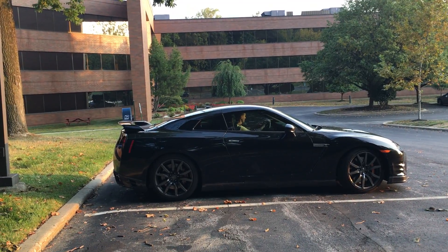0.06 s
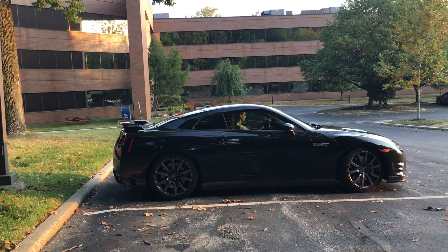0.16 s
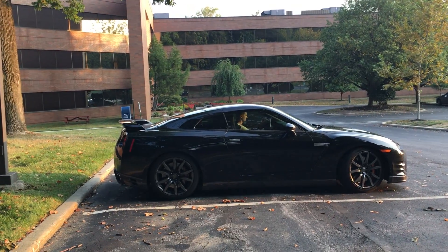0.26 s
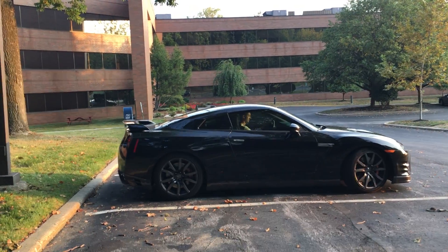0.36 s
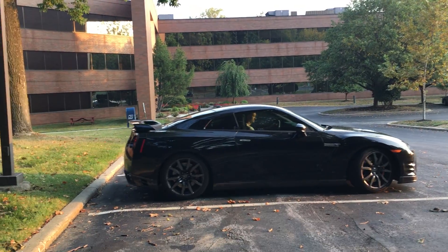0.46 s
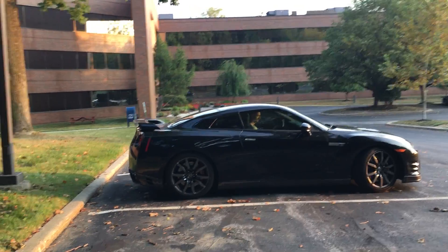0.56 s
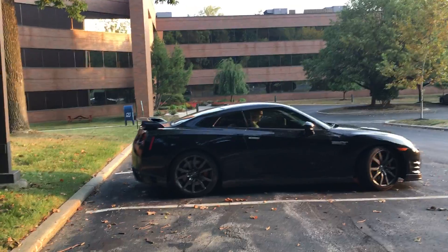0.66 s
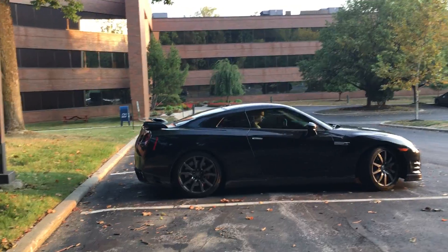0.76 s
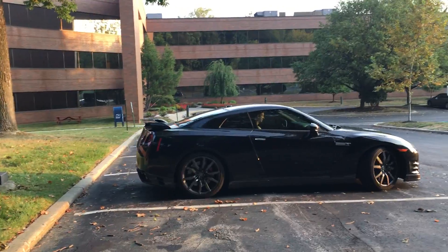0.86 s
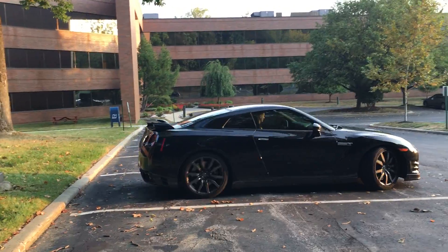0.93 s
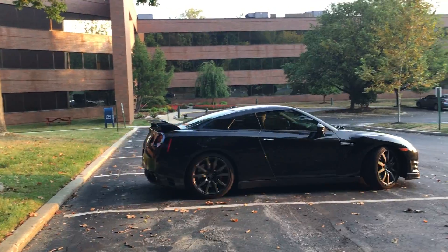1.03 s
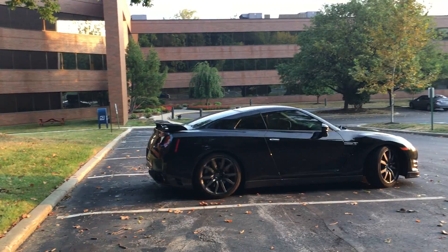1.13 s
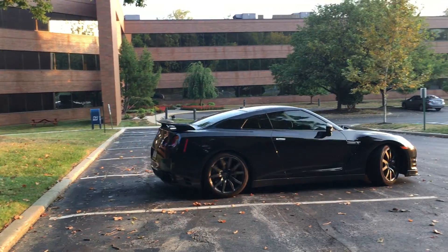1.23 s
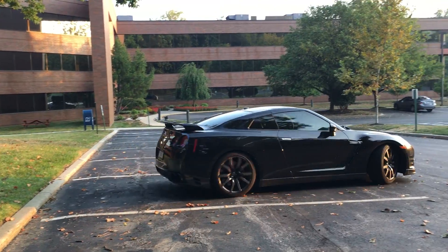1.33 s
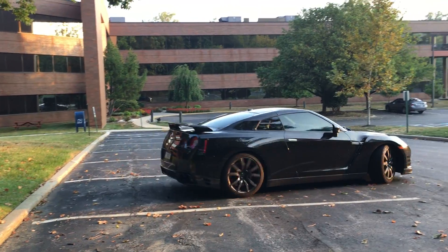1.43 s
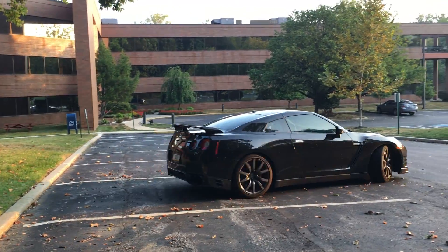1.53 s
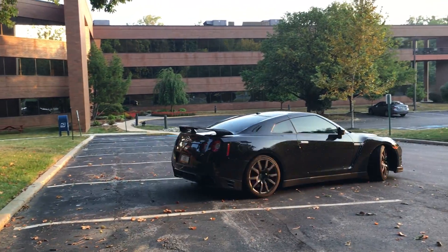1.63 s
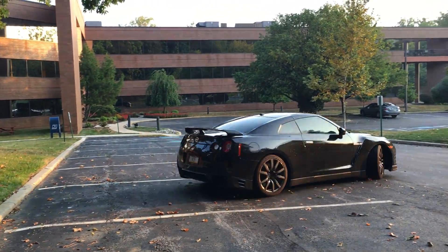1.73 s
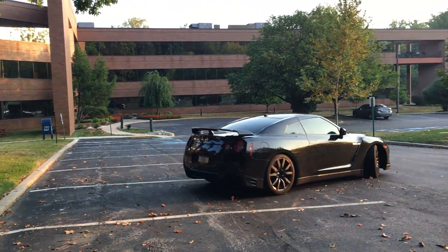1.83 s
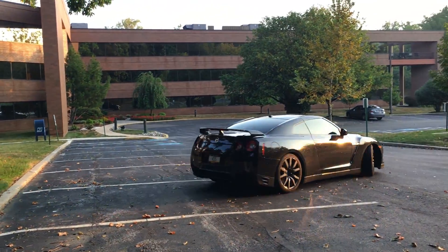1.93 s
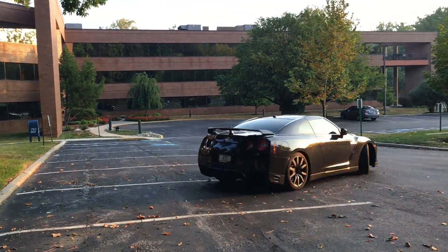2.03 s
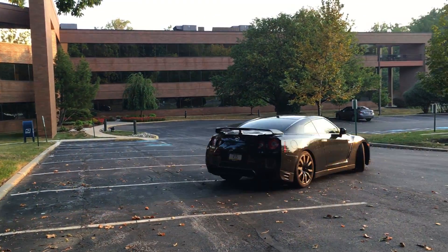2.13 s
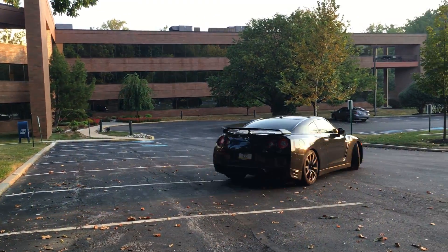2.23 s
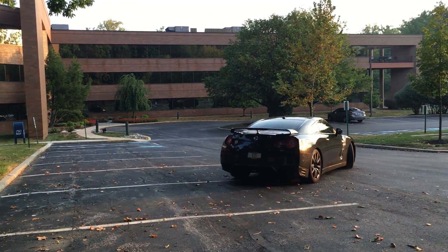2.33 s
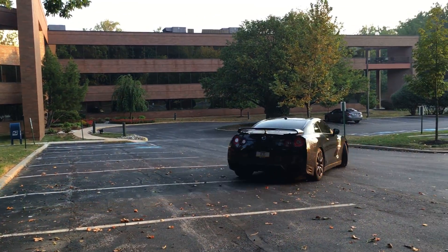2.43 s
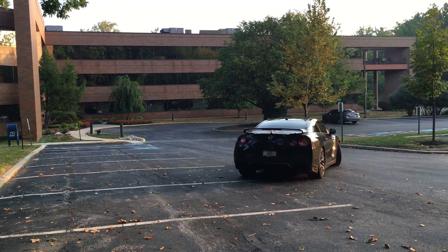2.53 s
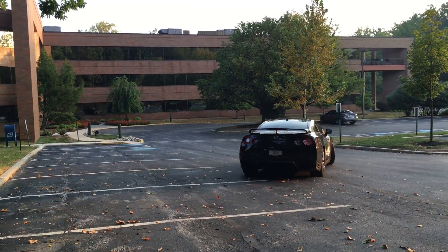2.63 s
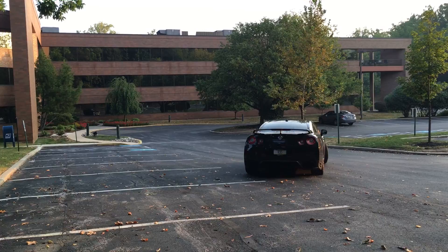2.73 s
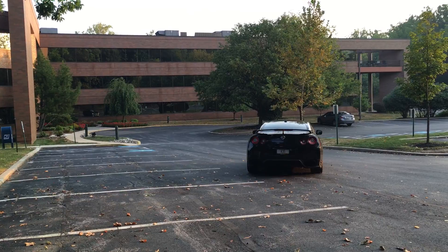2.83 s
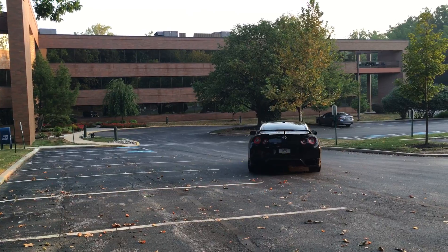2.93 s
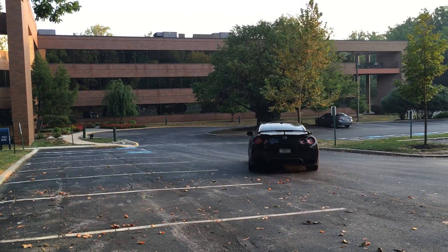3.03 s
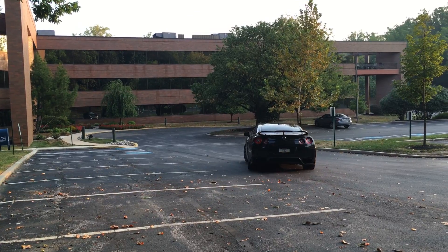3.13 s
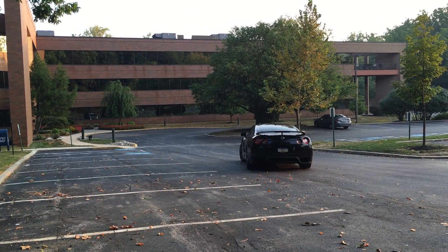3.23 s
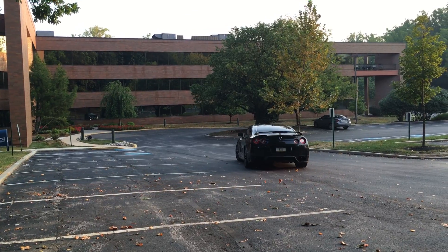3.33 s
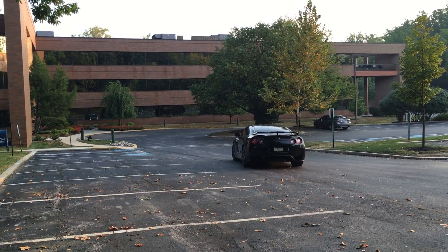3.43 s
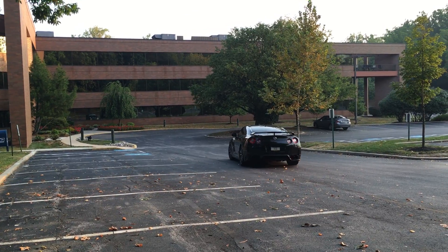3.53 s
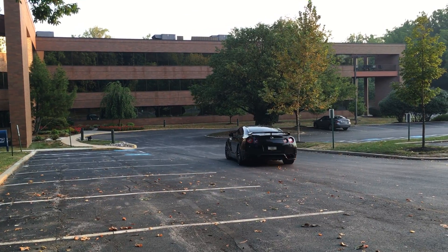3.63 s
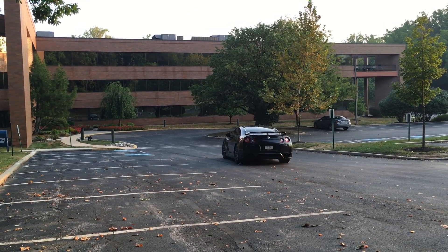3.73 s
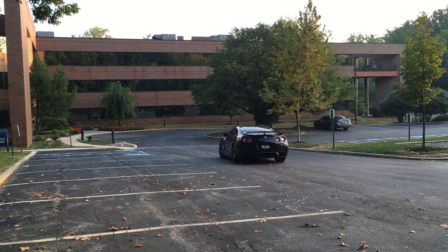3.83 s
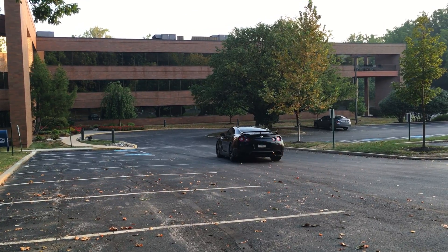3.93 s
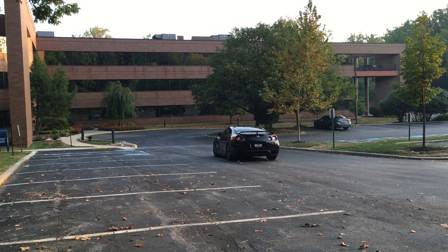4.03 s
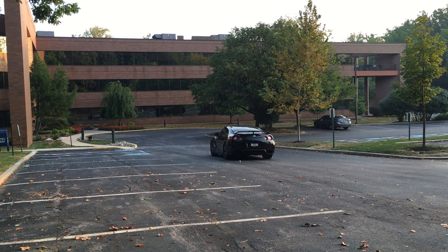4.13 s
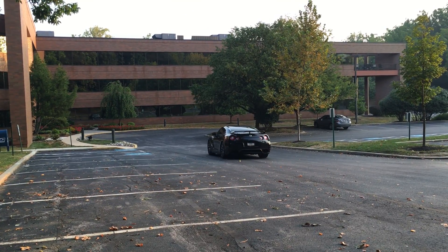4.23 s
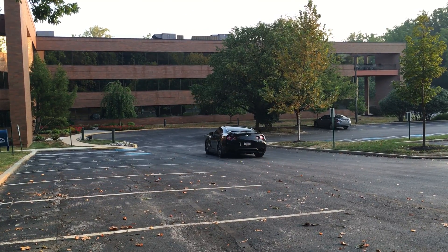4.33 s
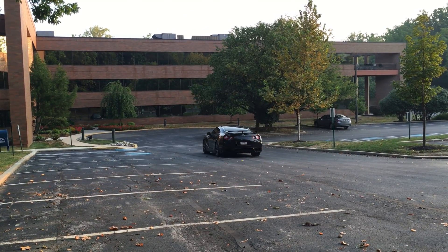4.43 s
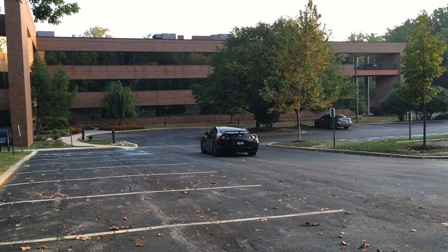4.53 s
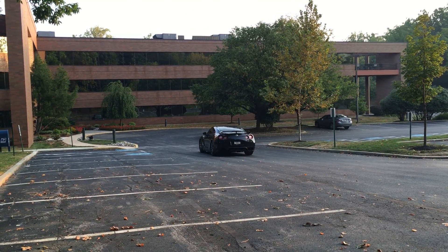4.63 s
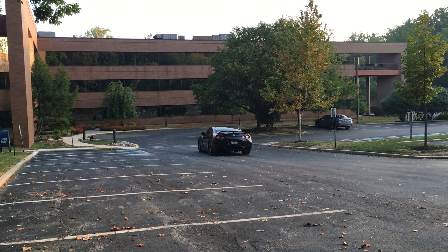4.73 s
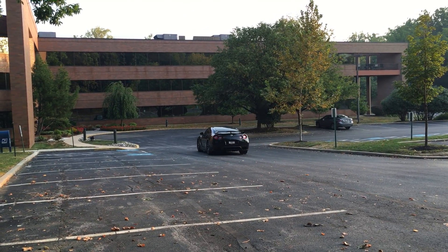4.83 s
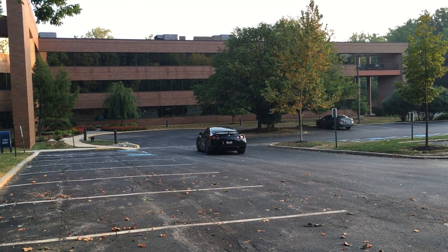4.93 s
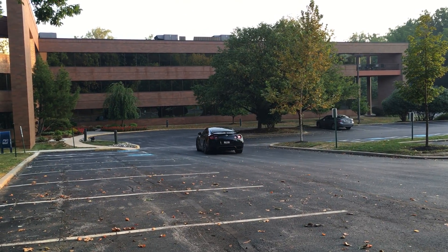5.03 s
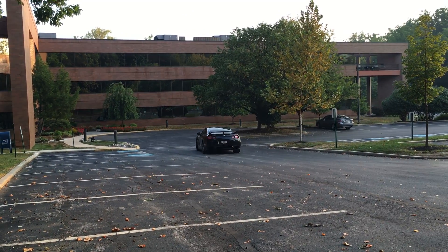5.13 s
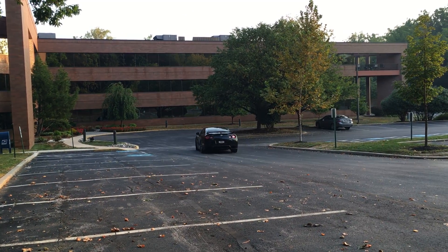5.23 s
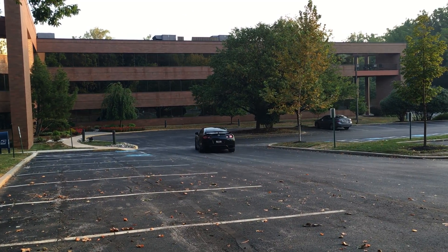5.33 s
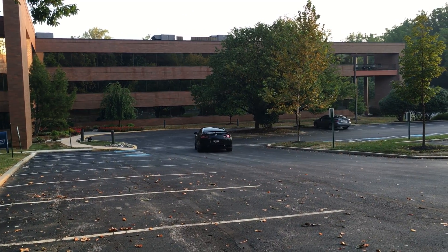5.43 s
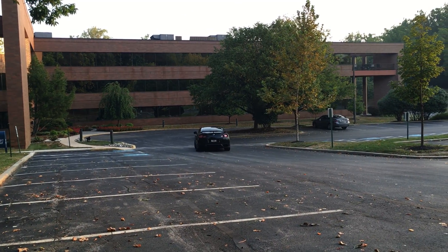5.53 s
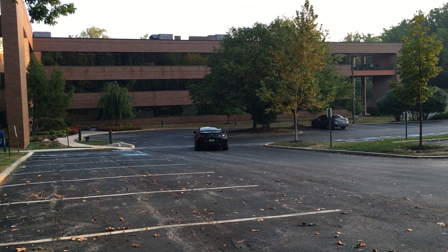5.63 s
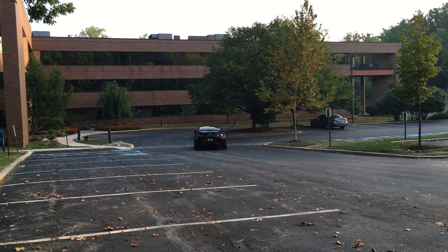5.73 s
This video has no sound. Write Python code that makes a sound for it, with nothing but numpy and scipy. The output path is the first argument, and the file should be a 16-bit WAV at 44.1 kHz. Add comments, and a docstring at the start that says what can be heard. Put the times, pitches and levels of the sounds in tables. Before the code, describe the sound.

A throaty sports car engine revs up from idle and drives off across a parking lot, fading with soft exhaust pops.

```python
"""A six-cylinder sports car idles in a parking lot, pulls away in first gear and lifts off in the distance.
Its exhaust pulses boom at harmonics of the firing rate, rasp once per engine cycle under load and
ring the pipes in burbles and pops on the overrun. A gear whines with the revs, belts whir, turbos hiss
and the drive creaks. Tyres hiss over gritty asphalt, a building echoes and insects shrill steadily
in the trees; an automatic gain ducks under the engine."""
import sys
import numpy as np
from scipy import signal
from scipy.fft import rfft, irfft
from scipy.io import wavfile
from scipy.ndimage import uniform_filter1d

SR = 44100
rng = np.random.default_rng(int(sys.argv[2]) if len(sys.argv) > 2 else 0)


def inscribe(sig):
    """Save sig as 16-bit PCM at rate SR to the path in sys.argv[1].

    A 1-D sig is mono; a 2-D sig holds one channel per row.
    Samples are clipped to [-1, 1] before scaling.
    """
    pcm = np.round(np.clip(np.atleast_2d(sig).T, -1, 1) * 32767)
    wavfile.write(sys.argv[1], SR, pcm.astype(np.int16))


N = 254456
TIME = np.arange(N) / SR
CYLINDERS = 6
# engine speed: time_s, firing_rate_hz
FIRING_RATE = [(0.0, 36.27), (0.17, 40.35), (0.43, 57.62), (0.72, 60.11), (0.85, 64.27), (1.15, 59.65),
               (1.44, 64.0), (1.6, 63.75), (1.8, 66.09), (1.95, 63.83), (2.16, 75.13), (2.3, 80.38),
               (2.7, 86.13), (2.88, 92.23), (3.45, 100.2), (3.96, 105.14), (4.55, 109.1), (4.8, 107.36),
               (5.3, 104.28), (5.77, 92.18)]
# engine load as strength of the exhaust pulses, dipping at the lift-off at 5 s: time_s, level_db
ENGINE_LOAD = [(0, -34), (.2, -15.5), (.36, -4.5), (.5, -1), (.7, -.5), (.86, -2.5), (.96, -1), (1.3, 0),
               (1.5, 0.5), (1.85, -.5), (2.0, -1), (2.2, -1), (2.55, -3.5), (2.7, -0.5), (3.4, 0),
               (4.9, -3.5), (5.03, -9), (5.24, -7.5), (5.34, -2), (5.77, -2.5)]
# resonances of the long exhaust pipes: pitch_hz, width_hz, gain_db
PIPE_MODES = [(60, 19, 4.5), (129.6, 27, 1), (225, 8.8, -0.5), (255.5, 25.7, -3.5), (341.3, 15, -12.5)]
# resonances of the tailpipes: pitch_hz, width_hz, gain_db
TAILPIPE_MODES = [(460.6, 43, 10), (524, 33, 10), (578, 170, -3), (696, 52, 8), (725, 160, -1.5)]
# dull pops on the overrun: start_s, relative_db
OVERRUN_POPS = [(5.043, -23), (5.086, -25.5), (5.128, -26), (5.21, -20), (5.25, -26.5), (5.278, -28.5),
                (5.464, -30)]
# relative levels of the broadband noises: time_s, rush_db, tyre_hiss_db
NOISE_LEVELS = [(0, -49, -67.5), (.3, -44.5, -65.5), (1.2, -43, -61.5), (1.66, -40.5, -58.5),
                (2.7, -42, -59.5), (3.5, -44.5, -64.5), (4.6, -44.5, -67.5), (5.77, -46.5, -69.5)]


def from_db(db):
    """Decibels to amplitude ratio."""
    return 10 ** (np.asarray(db) / 20)


def rms_one(x):
    """Normalisation to unit power."""
    return x / np.sqrt(np.mean(x ** 2) + 1e-20)


def in_time(rows):
    """Linear interpolation of each column of a curve at every sample."""
    times_s, *columns = np.transpose(rows)
    return [np.interp(TIME, times_s, column) for column in columns]


def butter(x, hz, kind, order=2):
    """Causal Butterworth filter."""
    return signal.sosfilt(signal.butter(order, hz, kind, fs=SR, output="sos"), x + 1e-18)


def resonate(x, hz, width_hz):
    """Two-pole resonator with unit peak gain."""
    r = np.exp(-np.pi * width_hz / SR)
    feedback = [1, -2 * r * np.cos(2 * np.pi * hz / SR), r * r]
    return signal.lfilter(np.array([1, 0, -1]) * (1 - r * r) / 2, feedback, x + 1e-18)


def ring(x, modes):
    """Modal superposition: resonators in parallel, signs alternating."""
    return sum((-1) ** k * from_db(db) * resonate(x, hz, width)
               for k, (hz, width, db) in enumerate(modes))


def steady(x, window_s):
    """Normalisation to unit power within a sliding window."""
    size = int(window_s * SR)
    return x / np.sqrt(np.abs(uniform_filter1d(uniform_filter1d(x ** 2, size), size)) + 1e-16)


def noise(spectrum):
    """Spectrally shaped noise of unit power."""
    hz, db = np.transpose(spectrum)
    bins = np.maximum(np.fft.rfftfreq(N, 1 / SR), 1)
    gain = from_db(np.interp(np.log(bins), np.log(hz), db, left=-np.inf, right=-np.inf))
    return rms_one(irfft(rfft(rng.standard_normal(N)) * gain, N))


def noise_band(hz, width_hz):
    """Narrow-band noise of unit power: two equal resonators in cascade."""
    return rms_one(resonate(resonate(rng.standard_normal(N), hz, width_hz), hz, width_hz))


def drift(hz):
    """Slow random modulation: low-passed noise of unit power."""
    bins = np.fft.rfftfreq(N, 1 / SR)
    return rms_one(irfft(rfft(rng.standard_normal(N)) / (1 + (bins / hz) ** 2) ** 2, N))


def impulses(at, heights):
    """Impulse train at the given samples."""
    out = np.zeros(N)
    out[np.clip(np.asarray(at).astype(int), 0, N - 1)] = heights
    return out


def ticks(rows, decay_s, relative_width, gain_db):
    """Exponentially damped noise bursts, each filtered around its own pitch."""
    out, age = np.zeros(N), TIME[:SR // 10]
    for start_s, db, hz in rows:
        burst = rng.standard_normal(len(age)) * np.exp(-age / decay_s)
        burst = resonate(resonate(burst, hz, hz * relative_width), hz, hz * relative_width)
        at = int(start_s * SR)
        out[at:at + len(age)] += from_db(db + gain_db) * burst / np.abs(burst).max()
    return out


def spreading_db(start_s=0.43, nearest_m=6.83, acceleration_m_s2=1.806):
    """Spherical spreading: pressure falls as 1/distance while the car accelerates evenly away."""
    travelled_m = acceleration_m_s2 * np.maximum(TIME - start_s, 0) ** 2 / 2
    return 20 * np.log10(nearest_m / np.hypot(nearest_m, travelled_m))


def tail_on(middle_s=2.28, length_s=2.02):
    """Heading for directivity: 0 side-on, 1 once the tailpipes face the listener."""
    return (1 + np.sin(np.pi * np.clip((TIME - middle_s) / length_s, -.5, .5))) / 2


def exhaust_db(directivity_db=5):
    """Exhaust level at the listener: load, spreading and directivity add in decibels."""
    return in_time(ENGINE_LOAD)[0] + spreading_db() + directivity_db * tail_on()


def flare(rows, floor_db, shift_hz=0):
    """Forced resonance: the gain swells as the firing rate passes each resonant speed."""
    rate_hz = in_time(FIRING_RATE)[0] - shift_hz
    return from_db(floor_db) + sum(from_db(db) * np.exp(-((rate_hz - centre) / width) ** 2 / 2)
                                   for centre, width, db in rows)


def engine_cycle(firings):
    """Phase in engine cycles, whole when the loudest cylinder exhausts."""
    return (firings - .1) / CYLINDERS


def bark(firings):
    """Amplitude modulation: a short swell, 0 to 1, once per engine cycle."""
    return np.cos(np.pi * engine_cycle(firings)) ** 8


def insects():
    """A chorus of insects sums incoherently to a shrill band of noise."""
    # chorus spectrum: frequency_hz, density_db
    spectrum = [(4600, -44), (5200, -9.5), (5550, -2), (5900, 1), (6250, -3.5), (6650, -0.5), (7100, -3.5),
                (7450, -18), (8500, -17.5)]
    return from_db(-56.5 + 0.52 * drift(30)) * noise(spectrum)


def rush():
    """Engine bay, tyres and town merge into broadband noise, strongest in the bass."""
    # rush spectrum: frequency_hz, density_db
    spectrum = [(20, 17.5), (60, 11.5), (300, 14), (500, 1), (900, -1.5), (1300, 0.5), (1900, -0.5),
                (2330, -5), (2600, -9), (3050, -13), (3400, -10.5), (3900, -18), (4900, -22), (7500, -32)]
    return from_db(in_time(NOISE_LEVELS)[0] + 6.5 + .5 * drift(25)) * noise(spectrum)


def facade_echoes(x):
    """Reflection from an office front returns delayed, low-passed copies."""
    # reflections: delay_s, gain_db
    echoes = [(0.048, -20.5), (0.114, -35), (0.197, -22), (0.29, -44)]
    dull = butter(x, 2560, "low", order=1)
    return sum(from_db(db) * np.interp(TIME - delay_s, TIME, dull, left=0) for delay_s, db in echoes)


def tyres(grains_per_s=670):
    """Rolling noise: tread hiss, shot noise from sand grains and the cracks of single stones."""
    # tread hiss spectrum: frequency_hz, density_db
    tread = [(2000, -26), (4000, 0.5), (7500, 0.5), (9000, 4.5), (9800, 2.5), (10500, -4), (11400, 0.5),
             (13000, -6), (15700, -9)]
    # stones cracking under the tyres: start_s, relative_db, pitch_hz
    stones = [(1.386, -51, 8660), (1.632, -49, 9380), (1.652, -52, 9470), (1.7804, -53, 7440),
              (2.1924, -54, 8580), (3.0954, -57, 9510), (3.3353, -55, 9600), (3.4511, -63, 8800),
              (3.522, -52, 7730), (4.0567, -57, 8600)]
    grains = rng.choice([-1, 1], N) * (rng.random(N) < grains_per_s / SR)
    grit = rms_one(butter(butter(grains, 3500, "high"), 9000, "low", order=1))
    hiss = from_db(in_time(NOISE_LEVELS)[1]) * (from_db(1) * noise(tread) + from_db(-3) * grit)
    return hiss + ticks(stones, decay_s=.003, relative_width=0.28, gain_db=6)


def drive_creaks():
    """Damped transients sound as the drive takes up the load."""
    # creaks: start_s, relative_db, pitch_hz
    creaks = [(.205, -38, 1830), (.275, -44, 4000), (.305, -37, 1630), (.325, -54, 4140), (.332, -64, 1170),
              (.53, -32.5, 1680)]
    return ticks(creaks, decay_s=0.011, relative_width=0.12, gain_db=-1)


def engine_bay(load_share=0.35, shadow_db=-15.5):
    """Belts and pumps whir in narrow bands, shadowed as the car turns its tail."""
    # whirring bands: pitch_hz, width_hz, relative_db
    bands = [(657, 54, -50), (790, 190, -55.5), (1140, 89, -55), (1775, 35, -57.5), (3500, 440, -77)]
    level_db = 3.5 + load_share * in_time(ENGINE_LOAD)[0] + spreading_db() + shadow_db * tail_on()
    return from_db(level_db) * sum(from_db(db) * noise_band(hz, width) for hz, width, db in bands)


def turbos():
    """The turbos hiss as narrow-band noise with a random flutter in amplitude."""
    # hiss envelope: time_s, level_db
    envelope = [(.7, -57), (1.0, -49.5), (1.75, -47), (2.0, -51), (2.8, -56.5), (3.9, -53), (5.77, -62.5)]
    return from_db(in_time(envelope)[0] + 3 * drift(11)) * noise_band(hz=2211, width_hz=210)


def gear_whine(firings, teeth_per_firing=17):
    """Meshing teeth give a tone locked to the revs, wavering in phase and level."""
    # resonant speed: firing_rate_hz, width_hz, gain_db
    resonances = [(103.5, 8.9, -51)]
    mesh = np.sqrt(2) * np.sin(2 * np.pi * teeth_per_firing * firings + 0.8 * drift(16))
    return from_db(exhaust_db() + 1.5 * drift(25)) * flare(resonances, floor_db=-76.5) * mesh


def exhaust_gas(firings):
    """Turbulent flow, puffing at each firing and most with the bark, excites the tailpipe modes."""
    # resonant speeds: firing_rate_hz, width_hz, gain_db
    resonances = [(73, 6.64, -34.5), (84.8, 1.8, -38.5), (96.2, 3, -48)]
    puffs = 1 + 0.15 * np.cos(2 * np.pi * firings)
    flow = puffs * (1 + 0.85 * bark(firings)) * rng.standard_normal(N)
    piped = butter(ring(flow, TAILPIPE_MODES), 896, "low", order=4)
    piped = butter(piped, 583, "high", order=6)
    return from_db(0.78 * exhaust_db()) * flare(resonances, floor_db=-49) * steady(piped, 0.041)


def exhaust_pops():
    """Late-burning fuel excites the impulse response of the whole exhaust."""
    def response(x):
        """Pipe and tailpipe modes in parallel, low-passed."""
        return butter(ring(x, PIPE_MODES) + from_db(-14) * ring(x, TAILPIPE_MODES), 398, "low")
    start_s, db = np.transpose(OVERRUN_POPS)
    reference_peak = np.abs(response(impulses([0], 0.87))).max()
    return response(impulses(start_s * SR, -from_db(db))) / reference_peak


def pop_rumble(attack_s=0.0043, decay_s=0.024):
    """Envelope of the rumble each pop leaves in the pipes: quick swell, exponential decay."""
    envelope = 0
    for start_s, db in OVERRUN_POPS:
        age = np.maximum(TIME - start_s, 0)
        envelope += from_db(db - 2.5) * (1 - np.exp(-(age / attack_s) ** 2)) * np.exp(-age / decay_s)
    return envelope


def exhaust_burble(firings, valve_lag=0.427, bank_imbalance=0.18):
    """Uneven combustion: cylinder differences add cycle harmonics, random pulses ring the pipes."""
    # repeating pattern of the cylinders: cycle_order, level_db
    orders = [(4, -9), (5, -1), (7, -5), (8, -4), (9, -1), (10, -10), (11, -8), (15, -3), (16, -10),
              (17, -9), (19, -5), (20, -12), (21, -5), (23, -10), (25, -7)]
    pulse_number = np.floor(firings - valve_lag).astype(int)
    at = np.flatnonzero(np.diff(pulse_number)) + 1
    cylinder = pulse_number[at] % CYLINDERS
    idling = np.interp(TIME, [.2, .4], [1, 0])
    uneven = rng.uniform(-1.84, 1, len(at)) + bank_imbalance * (-1) ** cylinder
    push = uneven * (1 - 0.75 * idling[at]) + 2.6 * idling[at]   # at idle each pulse stands alone
    stumble = steady(butter(ring(impulses(at, push), PIPE_MODES), 356, "low", order=4), 0.21)
    lope = 0
    for order, db in orders:
        phase = 2 * np.pi * (order * firings / CYLINDERS + rng.random())
        lope += from_db(db) * np.cos(phase + 0.59 * drift(4.4))
    lope = rms_one(butter(lope, 356, "low", order=6))
    load_db = in_time(ENGINE_LOAD)[0]
    chance = np.clip(0.2 - 0.5 * load_db, 0, 1)   # the random share of the power grows off load
    gain = from_db(-27.5 + 0.46 * load_db + spreading_db()) + from_db(-38) * idling
    return gain * (np.sqrt(chance) * stumble + np.sqrt(1 - chance) * lope) + pop_rumble() * stumble


def exhaust_rasp(firings, middle_order=38.36, sweep_rad=0.024):
    """Constructive interference: high orders align once a cycle as one cylinder barks."""
    # harmonics of the engine cycle: cycle_order, relative_db
    orders = [(27, 9), (30, 8), (31, -7), (32, 6.5), (33, -17), (35, -3), (36, -8), (37, 4), (38, 5),
              (39, -2.5), (41, -8), (42, -21), (43, -8), (44, 1.5), (45, -25), (49, -15), (50, -4.5),
              (51, -10), (57, -23), (58, -15)]
    # pass band of the silencer: frequency_hz, gain_db
    silencer = [(340, -28), (430, -9), (475, -2.5), (520, -2), (560, -4.5), (605, -1), (650, 0.5),
                (700, 4.5), (735, -15), (780, -17), (850, -44)]
    # resonant speeds: firing_rate_hz, width_hz, gain_db
    resonances = [(77.6, 3.1, -38), (82.1, 1.7, -22), (96.4, 3.16, -28), (108.76, 2.16, -35)]
    cycle_hz = in_time(FIRING_RATE)[0] / CYLINDERS
    cycle = engine_cycle(firings) + .0015 * drift(10)
    out, power = 0, 0
    for order, db in np.round(orders):
        gain = from_db(db + np.interp(order * cycle_hz, *np.transpose(silencer)))
        above = order - middle_order
        phase = rng.uniform(-.6, .6) - sweep_rad * above ** 2   # each bark sweeps upward
        swell = flare(resonances, floor_db=-47, shift_hz=0.22 * above)   # high orders need more revs
        out += gain * swell * np.cos(2 * np.pi * order * cycle + phase)
        power += gain ** 2 / 2
    return from_db(-7.5 + 1.36 * exhaust_db()) * (1 + 0.52 * bark(firings)) * out / np.sqrt(power)


def exhaust_boom(firings, pipe_hz=234.5, half_width_hz=5.5):
    """Harmonics of the periodic pulse train swell, sink and turn in phase across pipe resonances."""
    # directivity of the first five firing harmonics: side_db, change_behind_db
    harmonics = [(0.5, 0.5), (-4, 2.5), (-2, 2.5), (1, -15.5), (-9.5, 2)]
    # frequency response of the exhaust: frequency_hz, gain_db
    response = [(37, -29), (47, -16), (57, -3), (65, -2.5), (77, -11.5), (104, -11.5), (126, -16),
                (163, -11.5), (192, -13.5), (214, -17), (234, -17), (262, -13), (284, -11), (305, -22),
                (325, -21.5), (348, -24), (450, -42)]
    out, rate_hz = 0, in_time(FIRING_RATE)[0]
    for k, (side_db, behind_db) in enumerate(harmonics, 1):
        db = side_db + behind_db * tail_on() + np.interp(k * rate_hz, *np.transpose(response))
        db += 0.35 * (k - 1) * spreading_db()   # upper harmonics fade first with distance
        pipe_phase = np.pi - 2 * np.arctan((k * rate_hz - pipe_hz) / half_width_hz)
        out += from_db(db + 1.19 * drift(12)) * np.cos(2 * np.pi * k * (firings - 0.042) + pipe_phase)
    return from_db(-7.5 + exhaust_db()) * out


def scene():
    """Superposition of the car, its echoes and the summer air."""
    firings = np.cumsum(in_time(FIRING_RATE)[0]) / SR   # phase, counted in firings
    car = exhaust_burble(firings) + exhaust_rasp(firings) + exhaust_gas(firings) + exhaust_pops()
    car += gear_whine(firings) + engine_bay() + turbos() + drive_creaks()
    background = tyres() + rush() + insects() + facade_echoes(car)
    return (background + car + exhaust_boom(firings))[None]


def gain_control(x, threshold_db=-23.5, slope=0.35, recovery_db_per_s=0.67):
    """Compression: the gain ducks quickly above a threshold and creeps back."""
    level_db = 10 * np.log10(butter(x ** 2, 3.4, "low", order=1) + 1e-12)
    wanted_cut_db = slope * np.maximum(level_db - threshold_db, 0)
    recovered_db = recovery_db_per_s * TIME
    cut_db = np.maximum.accumulate(wanted_cut_db + recovered_db, axis=-1) - recovered_db
    return x * from_db(-cut_db)


def record(dry):
    """Band limiting: the microphone sheds deep bass, the gain rides the level and the top is cut."""
    levelled = gain_control(butter(dry, 33.7, "high"))
    return signal.sosfilt(signal.ellip(12, .1, 90, 15750, fs=SR, output="sos"), levelled)


dry = scene()
out = record(dry)
inscribe(out)
```